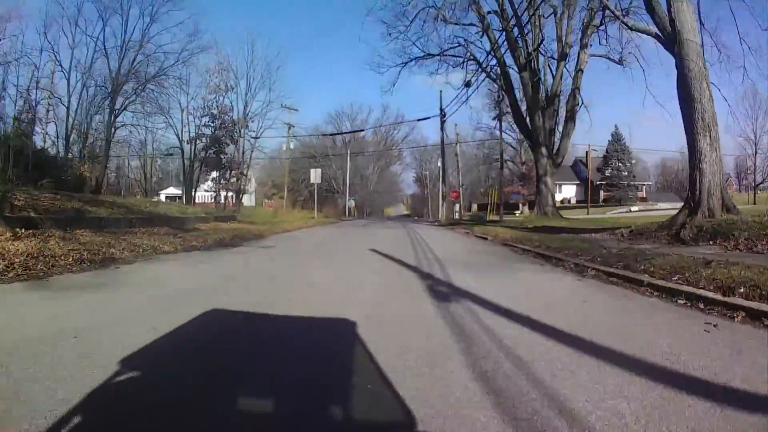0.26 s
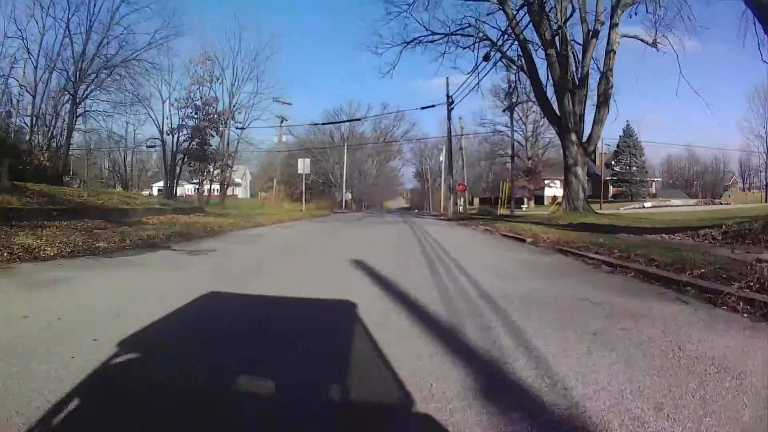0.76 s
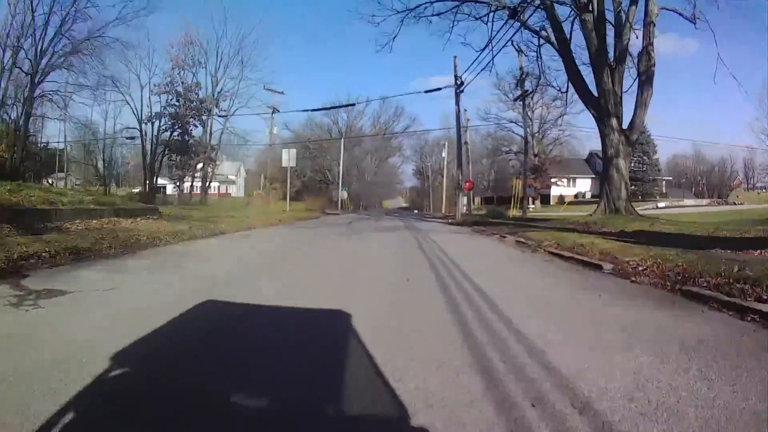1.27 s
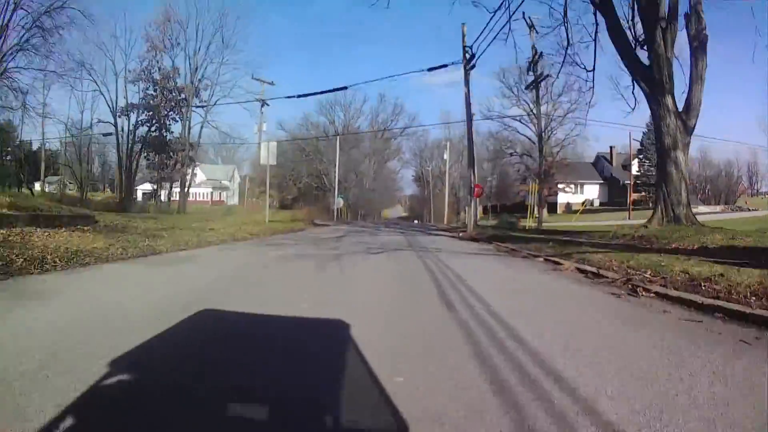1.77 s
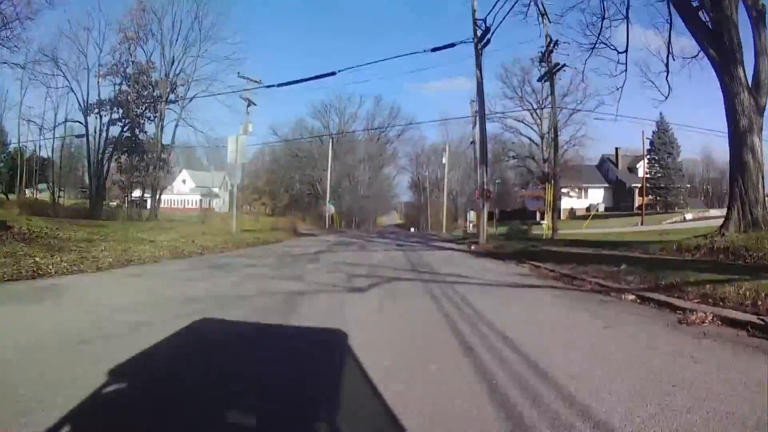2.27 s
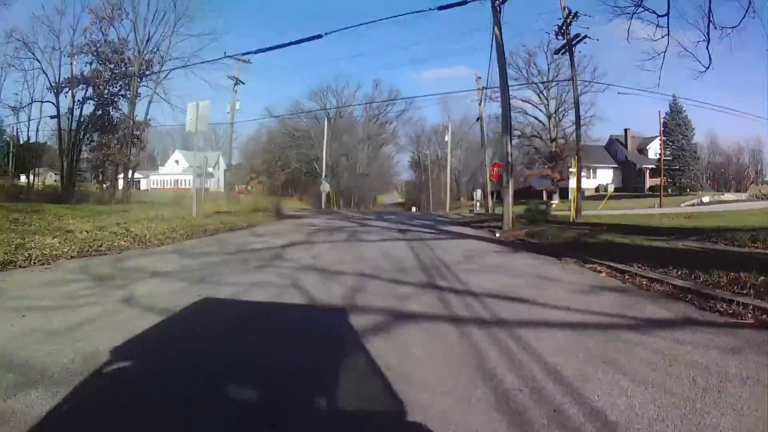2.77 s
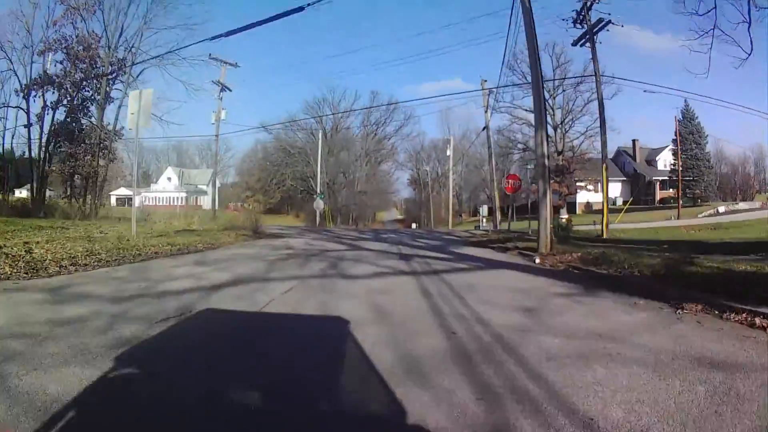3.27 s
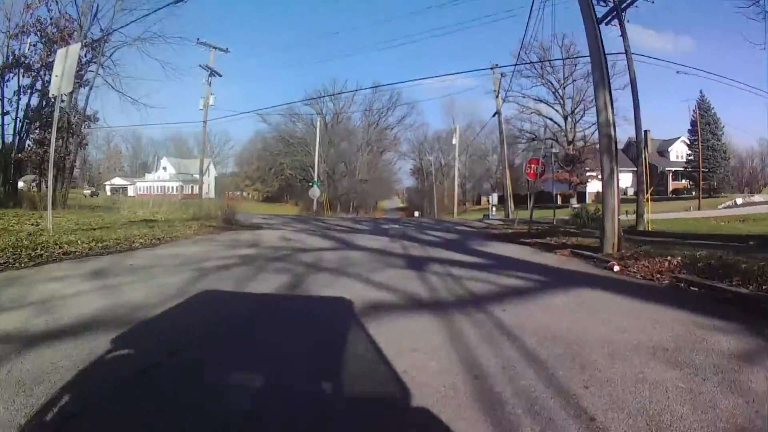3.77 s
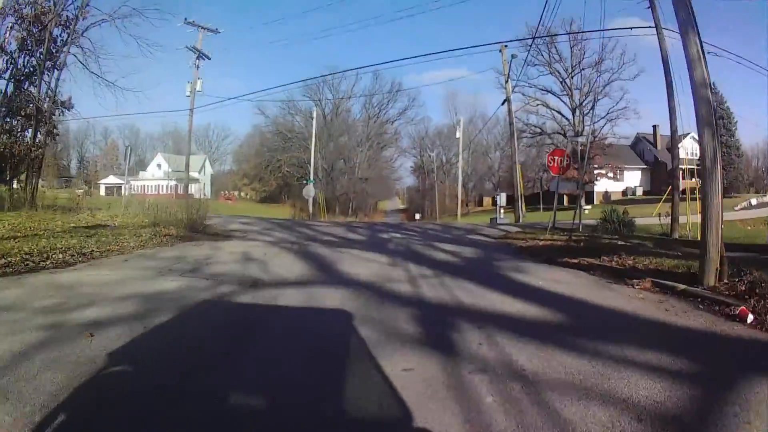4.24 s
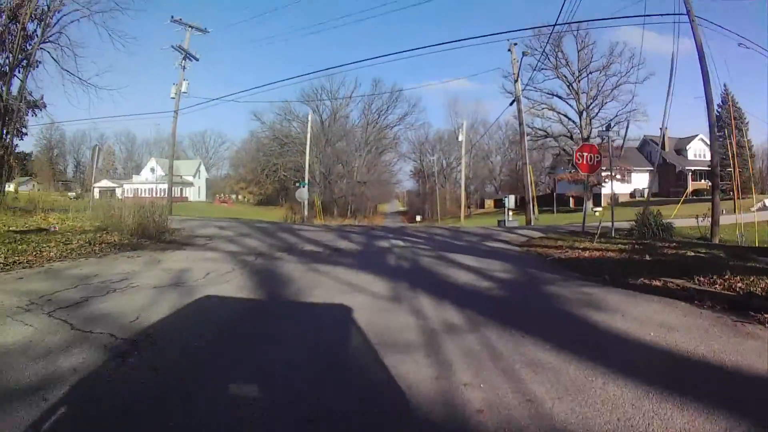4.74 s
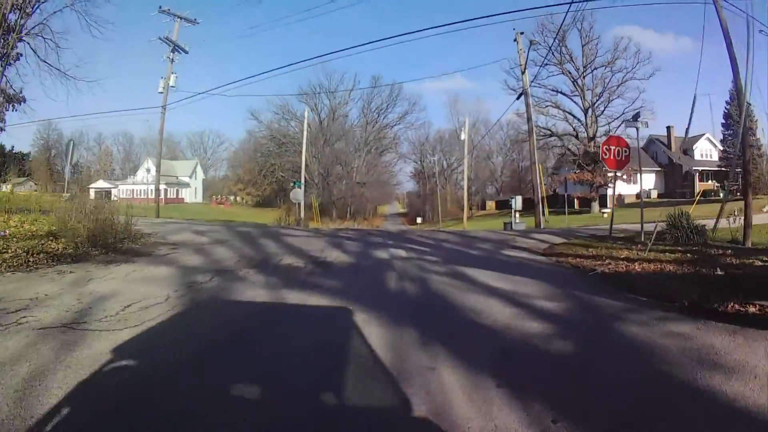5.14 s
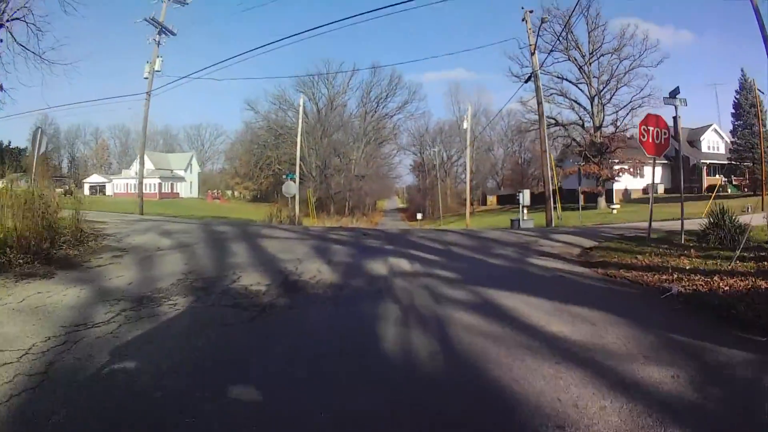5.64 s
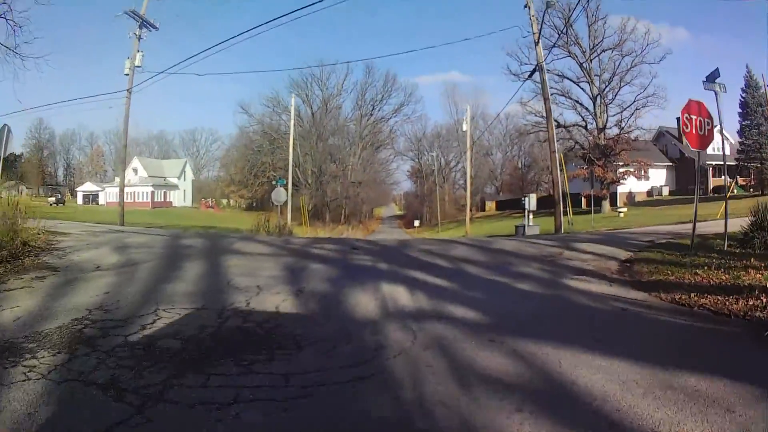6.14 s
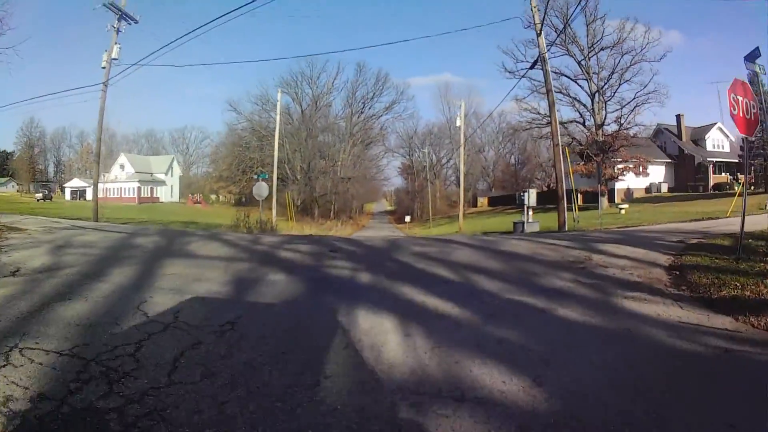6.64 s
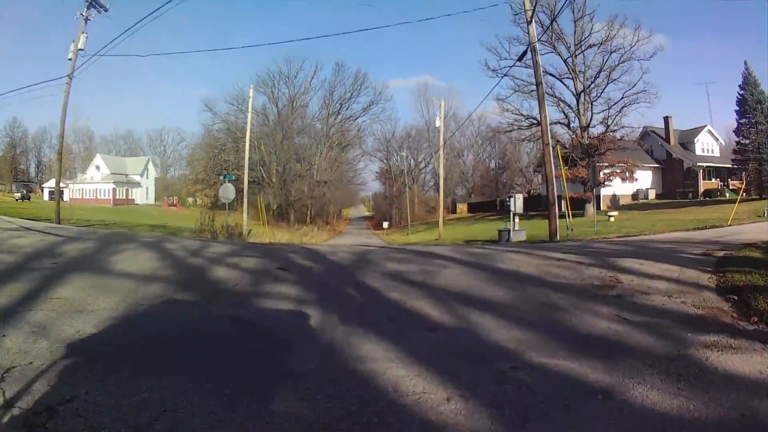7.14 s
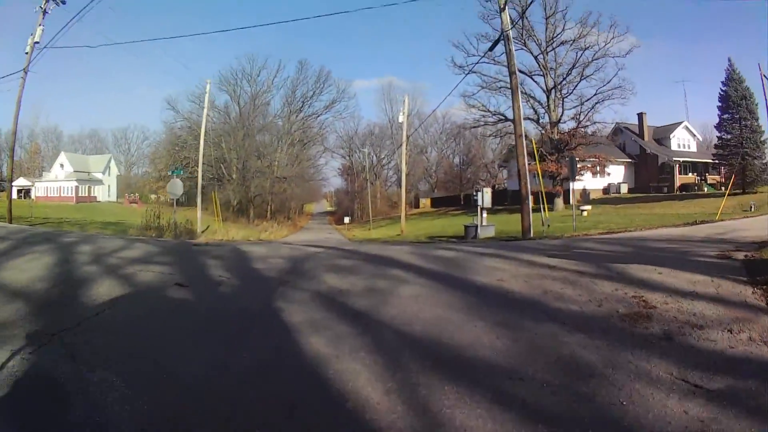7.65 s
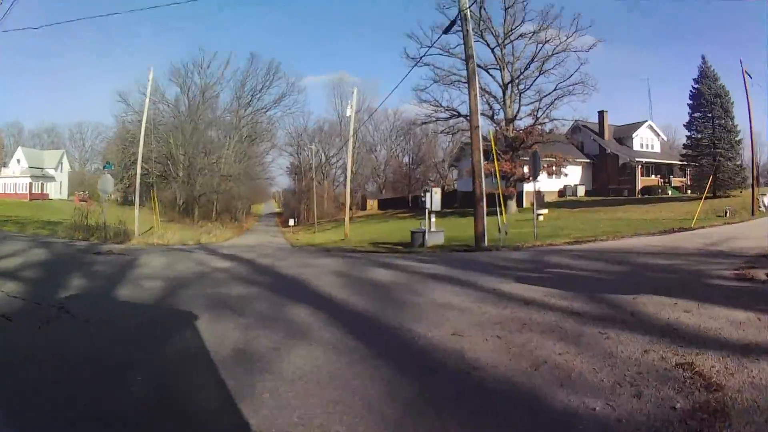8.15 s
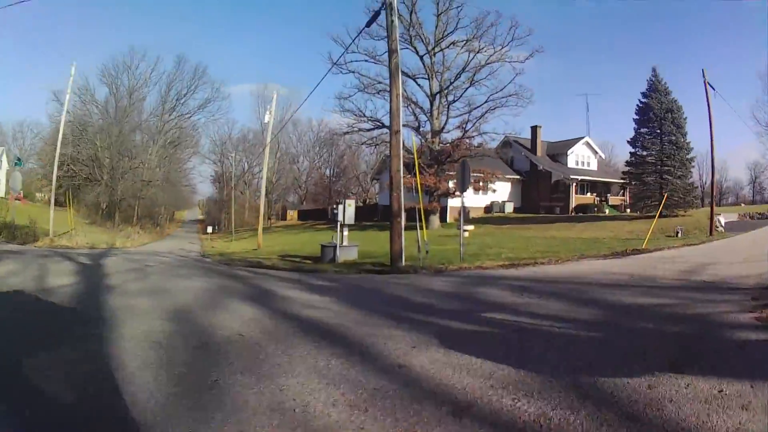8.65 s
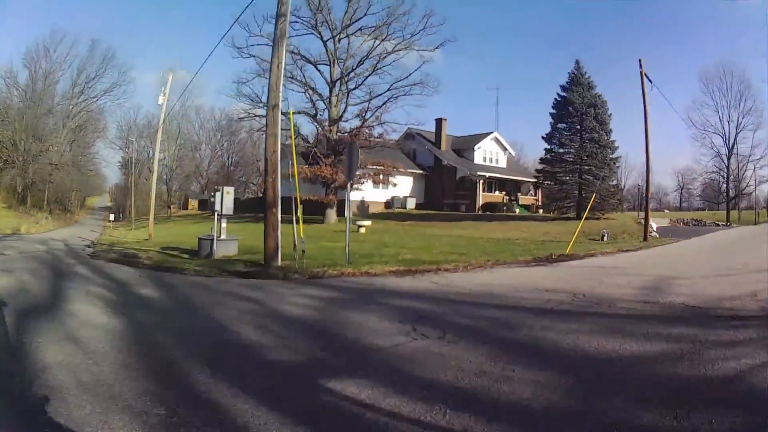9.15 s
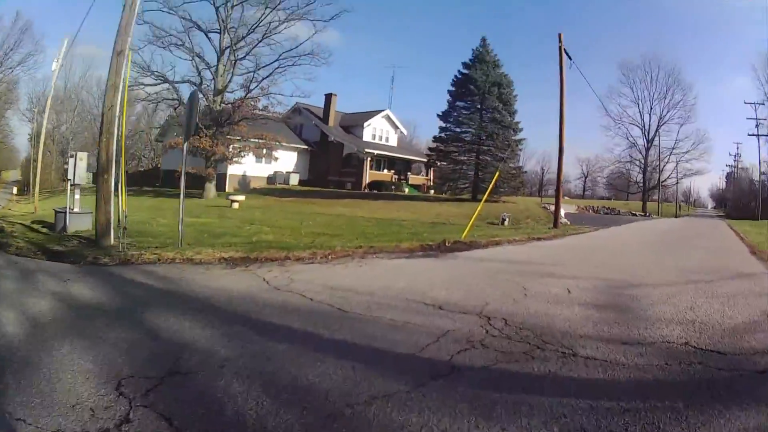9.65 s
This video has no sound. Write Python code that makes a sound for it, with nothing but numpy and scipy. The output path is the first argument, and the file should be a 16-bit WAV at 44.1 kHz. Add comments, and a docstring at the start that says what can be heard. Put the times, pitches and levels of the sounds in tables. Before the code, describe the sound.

Heard from on board a small petrol cart on an open road: coarse tyre roar, low chassis rumble, and a single-cylinder engine ticking over on the coast. Early jolts clunk the suspension and shake loose panels. The cart slows, roar fades, and belt chirps and valve knocks stand out over a gritty rhythmic rub. Near seven seconds the engine thumps unevenly, catches and pulls away with a throaty growl.

```python
"""Golf cart on board

A single-cylinder four-stroke cart rolls along a road, coasts down towards a junction and pulls away.
Gas puffs ring the exhaust, the belt squeaks once a cycle, the valves knock several times a cycle, the body
booms; tyres roar, and something, probably a brake drum, rubs rhythmically and shakes the loose fittings."""
import sys
import numpy as np
from scipy import signal
from scipy.fft import rfft, irfft
from scipy.io import wavfile
from scipy.ndimage import uniform_filter1d, minimum_filter1d

SR = 44100
rng = np.random.default_rng(int(sys.argv[2]) if len(sys.argv) > 2 else 0)


def wav_out(sig):
    """Save sig, one row per channel (or a flat mono array), as 16-bit PCM at SR to the path in sys.argv[1]."""
    wavfile.write(sys.argv[1], SR, np.round(np.clip(np.atleast_2d(sig).T, -1, 1) * 32767).astype(np.int16))


N = 437031
TIME_S = np.arange(N) / SR


def undb(db):
    """Decibels to gain."""
    return 10 ** (np.asarray(db) / 20)


def unit(x):
    """Scale to rms 1."""
    return x / np.sqrt(np.mean(x ** 2))


def curves(table):
    """Columns of a (start_s, ..) table, interpolated to one value per sample."""
    start_s, *columns = np.transpose(table)
    return [np.interp(TIME_S, start_s, column) for column in columns]


def noise():
    """White noise."""
    return rng.standard_normal(N)


def walk(rate_hz):
    """Random levels held 1 / rate_hz and slewed twice; rms 1."""
    hold = int(SR / rate_hz)
    steps = noise()[np.arange(N) // hold]
    return unit(uniform_filter1d(uniform_filter1d(steps, hold), hold))


def colour(x, points):
    """Causal minimum-phase filter through (freq_hz, level_db) points, by folding the cepstrum."""
    size = 8192
    freq_hz, level_db = np.transpose(points)
    bins_hz = np.arange(size // 2 + 1) * SR / size
    response_db = np.interp(np.log(bins_hz + 1), np.log(freq_hz), level_db)
    cepstrum = irfft(np.log(undb(response_db)))
    cepstrum[1:size // 2] *= 2
    cepstrum[size // 2 + 1:] = 0
    return signal.oaconvolve(x, irfft(np.exp(rfft(cepstrum))))[:N]


def lowpass(x, cutoff_hz):
    """Steep low-pass."""
    return signal.sosfilt(signal.butter(4, cutoff_hz, fs=SR, output="sos"), x)


def ring(x, modes):
    """Drive damped modes (freq_hz, width_hz, level_db); each swings against the one before."""
    t = TIME_S[:SR // 8]
    response = 0
    for k, (freq_hz, width_hz, level_db) in enumerate(modes):
        decay = width_hz * np.exp(-np.pi * width_hz * t)
        response = response + (-1) ** k * undb(level_db) * decay * np.cos(2 * np.pi * freq_hz * t)
    return signal.oaconvolve(x, response / SR)[:N]


def fade(x, decay_s):
    """Give every impulse an exponential tail."""
    return signal.lfilter([1], [1, -np.exp(-1 / (decay_s * SR))], x + 1e-18)


def impulses(times_s, sizes):
    """One impulse at each time."""
    return np.bincount(np.clip(np.asarray(times_s) * SR, 0, N - 1).astype(int), sizes, N)


def strike(blows, modes):
    """Blows (start_s, peak_db) that ring one set of modes."""
    start_s, peak_db = np.transpose(blows)
    single_peak = np.abs(ring(impulses([0], [1]), modes)).max()
    return ring(impulses(start_s, undb(peak_db)), modes) / single_peak


def strokes(table, cycle, throttle, scatter_db, jitter_s):
    """Impulses (place_cycles, coast_db, pull_db) in each engine cycle; throttle blends the two gains."""
    out = 0
    for place_cycles, coast_db, pull_db in table:
        times_s = np.interp(np.arange(int(cycle[-1]) + 1) + place_cycles, cycle, TIME_S)
        chance = rng.standard_normal((len(times_s), 2))
        load = np.interp(times_s, TIME_S, throttle)
        size = (1 - load) * undb(coast_db) + load * undb(pull_db)
        size = size * undb(scatter_db * chance[:, 1])
        inside = times_s < TIME_S[-1]
        out = out + impulses(times_s + jitter_s * chance[:, 0], size * inside)
    return out


# gas puffs of one cycle: place_cycles, coast_db, pull_db (relative)
PUFFS = [(.156, -20, 0), (.193, -18, -7), (.277, -11, -6), (.562, -20, -7.5), (.722, -13, -4.5)]
# exhaust response: freq_hz, level_db
PIPE_RESPONSE = [(30, -32), (55, -15), (85, 3), (120, 3), (160, 2.5), (195, -5.5), (240, 2), (330, -7.5),
                 (435, -17), (650, -10.5), (2000, -50)]
# muffler growl response: freq_hz, level_db
GROWL_RESPONSE = [(150, -37), (245, -8), (272, 3), (300, 3.5), (325, -1.5), (352, -.5), (388, 0), (410, -5),
                  (450, -25), (1000, -54)]
# gas hiss spectrum: freq_hz, level_db (per Hz)
GAS_SPECTRUM = [(250, 1), (450, 21.5), (700, 17), (1500, 8.5), (2700, -3), (3300, 4), (7000, -15.5),
                (12000, -31)]
# multiple that sings out under load: start_s, peak_db (before its waver)
DRONE_LEVEL = [(7.1, -60), (7.42, -33), (7.85, -28.5), (8.2, -27.5), (8.8, -28.5), (9.3, -33), (9.91, -32)]
PIPE_DB, GROWL_DB, GAS_DB = -33, -36.5, -39.0
DRONE_MULTIPLE, DRONE_WAVER_DB = 21, 3.1


def exhaust(cycle, throttle, speed_hz):
    """Puffs ring the pipe, harder at speed, each with gas hiss; load adds growl, one multiple sings."""
    puffs = strokes(PUFFS, cycle, throttle, scatter_db=.6, jitter_s=.00004)
    puffs = puffs * (speed_hz / speed_hz.mean()) ** 2.2
    pipe = undb(PIPE_DB) * unit(colour(puffs, PIPE_RESPONSE))
    growl = undb(GROWL_DB) * unit(colour(puffs * throttle ** 2, GROWL_RESPONSE))
    gas = undb(GAS_DB) * unit(colour(fade(puffs, decay_s=.012) * noise(), GAS_SPECTRUM))
    drone = np.cos(2 * np.pi * (DRONE_MULTIPLE * cycle + .011 * walk(12)))
    drone = drone * undb(curves(DRONE_LEVEL)[0] + DRONE_WAVER_DB * walk(9))
    return pipe + growl + drone + gas


# lone firings: start_s, peak_db (of the muffler ring)
FIRST_FIRINGS = [(6.73, -26), (6.764, -29), (6.986, -22), (7.017, -23), (7.222, -22), (7.254, -23),
                 (7.321, -21), (7.393, -23), (7.447, -18), (7.51, -22), (7.574, -22), (7.766, -22)]
# muffler modes: freq_hz, width_hz, level_db
MUFFLER_MODES = [(100, 20, 2), (165, 35, -3), (285, 40, 0), (480, 70, -10)]
GUST_DB = -7.5  # relative to the firing


def catching():
    """Lone firings as the engine catches: each thumps the muffler and blows a gust of gas."""
    start_s, peak_db = np.transpose(FIRST_FIRINGS)
    gust = unit(colour(noise(), CHASSIS_SPECTRUM)) * fade(impulses(start_s, undb(peak_db)), decay_s=.025)
    return strike(FIRST_FIRINGS, MUFFLER_MODES) + undb(GUST_DB) * gust


# body boom: start_s, level_db (before waver and load cut)
BOOM_LEVEL = [(0, -38.5), (.9, -40), (1.5, -43), (1.75, -35), (3, -39), (4.5, -39), (5.7, -42.5),
              (6.3, -52), (6.8, -52), (7.4, -38.5), (8.3, -44), (9.91, -47)]
BOOM_WAVER_DB, BOOM_LOAD_CUT_DB = 1.0, 6.3


def boom(cycle, throttle):
    """The body shakes at five times the cycle, less under load, and throbs once and twice a cycle."""
    tone = np.cos(2 * np.pi * (5 * cycle + .48 + .027 * walk(12)))
    throb = 1 + .2 * np.cos(2 * np.pi * (cycle - .4)) + .43 * np.cos(4 * np.pi * (cycle - .44))
    level_db = curves(BOOM_LEVEL)[0] + BOOM_WAVER_DB * walk(14.0) - BOOM_LOAD_CUT_DB * throttle
    return unit(tone * throb) * undb(level_db)


# valve knocks of one cycle: place_cycles, coast_db, pull_db (relative)
KNOCKS = [(.035, -2, -3), (.13, -4, -8), (.4, -6, -1), (.55, -6, 2), (.85, -9, -4)]
# engine cover modes: freq_hz, width_hz, level_db
COVER_MODES = [(1732, 36, 27.5), (1966, 52, 27.5), (1090, 42, -12)]
# broad cover response to a blow: freq_hz, width_hz, level_db
COVER_PANEL = [(1850, 170, 0)]
# valve knock level: start_s, level_db
KNOCK_LEVEL = [(0, -37.5), (1.5, -43.5), (2.5, -37), (3.6, -37.5), (5.2, -34.5), (5.8, -34.5), (6.5, -35),
               (7.8, -38), (9.91, -41)]


def valves(cycle, throttle):
    """Several valve knocks a cycle ring the engine cover, each with brief chatter."""
    knocks = strokes(KNOCKS, cycle, throttle, scatter_db=.5, jitter_s=.0003)
    chatter = noise() * (.018 * fade(knocks, decay_s=.006) + .015 * fade(knocks, decay_s=.045))
    cover = ring(ring(knocks + chatter, COVER_MODES), COVER_PANEL)
    return unit(lowpass(cover, cutoff_hz=2150)) * undb(curves(KNOCK_LEVEL)[0])


# belt squeak: start_s, peak_db (before scatter)
SQUEAK_LEVEL = [(0, -36), (2.5, -27), (4, -23), (5.15, -17.5), (5.8, -24.5), (6.3, -22), (7.4, -21.5),
                (8, -26), (8.8, -22), (9.91, -23.5)]
SQUEAK_PLACE_CYCLES, SQUEAK_HALF_S = .997, .0056
SQUEAK_LOW_HZ, SQUEAK_HIGH_HZ, SQUEAK_HIGH_SHARE = 1765, 1935, .55
SQUEAK_SCATTER_HZ, SQUEAK_SCATTER_DB = 25, 1.2


def belt(cycle):
    """One chirp per cycle, probably the drive belt; its two tones beat, so it peaks in a sharp tick."""
    times_s = np.interp(np.arange(int(cycle[-1])) + SQUEAK_PLACE_CYCLES, cycle, TIME_S)
    t = np.arange(-SR // 80, SR // 80) / SR
    envelope = np.exp(-np.abs(t / SQUEAK_HALF_S) ** 1.5)
    level_db = curves(SQUEAK_LEVEL)[0]
    out = np.zeros(N + len(t))
    for start_s, chance in zip(times_s, rng.standard_normal((len(times_s), 3))):
        i = int(start_s * SR)
        low = np.cos(2 * np.pi * t * (SQUEAK_LOW_HZ + SQUEAK_SCATTER_HZ * chance[0]))
        high = np.cos(2 * np.pi * t * (SQUEAK_HIGH_HZ + SQUEAK_SCATTER_HZ * chance[1]))
        tone = (1 - SQUEAK_HIGH_SHARE) * low + SQUEAK_HIGH_SHARE * high
        out[i:i + len(t)] += tone * envelope * undb(level_db[i] + SQUEAK_SCATTER_DB * chance[2])
    return out[len(t) // 2:][:N]  # centre each chirp on its time


# engine mount tones: cycle_multiple, peak_db (coasting at mean speed, before waver)
HUM_TONES = [(8, -49), (10, -43), (12, -46), (13, -47), (16, -49), (18, -44.5), (20, -46), (22, -48),
             (23, -45)]
HUM_WAVER_DB = 1.5


def hum(cycle, throttle, speed_hz):
    """The coasting engine hums through its mounts on multiples of the cycle, and fades as it slows."""
    uneven = cycle + .002 * walk(8)
    tones = 0
    for multiple, peak_db in HUM_TONES:
        tones = tones + undb(peak_db) * np.cos(2 * np.pi * (multiple * uneven + rng.random()))
    return tones * undb(HUM_WAVER_DB * walk(8)) * (1 - throttle) * (speed_hz / speed_hz.mean()) ** 3


# tyres and chassis: start_s, roar_db (before waver), rumble_db (before waver)
ROAD_LEVEL = [(0, -26, -26), (.9, -27, -28), (1.1, -26, -25), (1.3, -27, -27.5), (1.62, -27, -23.5),
              (1.8, -27.5, -29), (3, -28.5, -30), (4, -31, -32.5), (5.6, -35.5, -35), (5.85, -34, -37.5),
              (6.6, -35.5, -39), (7, -31.5, -38), (7.5, -33, -33), (8.1, -32, -36.5), (9.91, -31.5, -36)]
# tyre roar spectrum: freq_hz, level_db (per Hz)
TYRE_SPECTRUM = [(400, -5), (700, -0.5), (900, -1), (1020, 0.5), (1170, 1.5), (1400, -2.5), (1700, 0.5),
                 (2000, -6.5), (2200, -10.5), (2700, -30.5), (4500, -36.5)]
# chassis rumble spectrum: freq_hz, level_db (per Hz)
CHASSIS_SPECTRUM = [(25, -13), (50, -12.5), (90, 3), (135, -5.5), (190, 1.5), (250, -3.5), (330, 1.5),
                    (400, -3), (470, 1), (620, -3.5), (850, -10), (2000, -64.5)]
# floor panel modes: freq_hz, width_hz, level_db
FLOOR_MODES = [(440, 28, 0), (512, 32, 0), (640, 35, -5)]
FLOOR_DB = -42


def road():
    """Tyres roar on coarse asphalt as filtered noise; the chassis rumbles and the floor panel rings."""
    roar_db, rumble_db = curves(ROAD_LEVEL)
    roar = unit(colour(noise(), TYRE_SPECTRUM)) * undb(roar_db + 1.24 * walk(35))
    rumble = unit(colour(noise(), CHASSIS_SPECTRUM)) * undb(rumble_db + .3 * walk(22))
    floor = undb(FLOOR_DB) * unit(ring(noise(), FLOOR_MODES))
    return roar + rumble + floor


# body resonance that the tread excites: freq_hz, width_hz, level_db
TREAD_MODES = [(106, 11, 0)]
# tread hum: start_s, level_db
TREAD_LEVEL = [(0, -34), (1.6, -38), (2.6, -39), (3.3, -44.5), (7, -76), (9.91, -49)]
TREAD_MULTIPLE = 20  # tread cycles per pair of rubs


def tread(rub_pairs):
    """The tyre tread hums: a tone at a multiple of the rub rhythm drives a body resonance."""
    tone = np.cos(2 * np.pi * (TREAD_MULTIPLE * rub_pairs + .28 * walk(6.5)))
    return unit(ring(tone, TREAD_MODES)) * undb(curves(TREAD_LEVEL)[0])


# road jolts: start_s, peak_db (of the suspension clunk)
BUMPS = [(1.03, -15.5), (1.099, -12), (1.2, -17), (1.4, -14), (1.56, -13), (1.608, -12), (2.26, -19),
         (3.226, -11), (3.468, -16), (4.284, -18)]
# body thud spectrum: freq_hz, level_db (per Hz)
THUD_SPECTRUM = [(50, -22), (130, 0), (200, 1), (330, 2), (450, -3), (620, -3), (900, -12), (2000, -45)]
# suspension modes: freq_hz, width_hz, level_db
SUSPENSION_MODES = [(195, 28, -5), (335, 30, -3), (470, 35, -5), (555, 22, 2), (645, 28, -1)]
THUD_DB, THUD_DECAY_S = -11.5, .04  # level relative to the jolt


def bumps():
    """Each road jolt clunks the suspension modes and thuds the body as a burst of low noise."""
    start_s, peak_db = np.transpose(BUMPS)
    thuds = unit(colour(noise(), THUD_SPECTRUM)) * fade(impulses(start_s, undb(peak_db)), THUD_DECAY_S)
    return undb(THUD_DB) * thuds + strike(BUMPS, SUSPENSION_MODES)


# rattle spectrum: freq_hz, level_db (per Hz)
RATTLE_SPECTRUM = [(800, -10), (1600, 6), (2300, 4.5), (2800, -5), (3250, 0), (3800, -5.5), (4500, -6.5),
                   (6500, -12), (10000, -14.5), (13000, -47)]
# chatter of the fittings: start_s, level_db
RATTLE_LEVEL = [(0, -38), (1.35, -41), (1.6, -30), (1.8, -41), (2.15, -29.5), (2.7, -40), (4.1, -44),
                (4.6, -62), (6.9, -64), (8, -37.5), (8.4, -41), (9.91, -40)]
# hardest clacks: start_s, peak_db (before crackle), decay_s
CLACKS = [(1.025, -25, .025), (1.104, -25, .01), (1.143, -21, 0.015), (1.188, -27, 0.006),
          (1.439, -27, 0.0074), (1.524, -26.5, 0.023), (1.61, -21.5, 0.06), (1.835, -25, 0.011),
          (1.906, -27, 0.0074), (2.148, -35, 0.02), (2.225, -30, .016), (2.672, -29, 0.0069),
          (3.21, -32, 0.036), (6.003, -32, 0.023), (6.639, -36, .023), (7.449, -24, 0.016),
          (7.517, -22, .0095)]
SHAKE_DB, SHAKE_LEAD_PAIRS = 3, .07  # ticks swell just ahead of each rub
TICK_DECAY_S, CRACKLE_DB = .002, 4.5


def fittings(rub_pairs, swing):
    """Loose panels chatter in small random ticks, most just ahead of each rub, with harder clacks."""
    draws = rng.random((4000, 2))
    sizes = undb(-3.6 * np.log(draws[:, 1])).clip(0, 6)
    ticks = impulses(draws[:, 0] * TIME_S[-1], sizes)
    shake = undb(SHAKE_DB * swing * np.cos(4 * np.pi * (rub_pairs + SHAKE_LEAD_PAIRS)))
    chatter = unit(colour(fade(ticks * shake, TICK_DECAY_S) * noise(), RATTLE_SPECTRUM))
    chatter = chatter * undb(curves(RATTLE_LEVEL)[0])
    clacks = sum(fade(impulses([start_s], [undb(peak_db)]), decay_s) for start_s, peak_db, decay_s in CLACKS)
    grain = noise() * undb(CRACKLE_DB * walk(450))
    return chatter + clacks * unit(colour(grain, RATTLE_SPECTRUM))


# clinks: start_s, peak_db
CLINKS = [(.331, -33), (.63, -29), (1.961, -25), (2.044, -27), (2.205, -25), (2.229, -28), (2.289, -27),
          (2.396, -26), (2.762, -33), (2.832, -32), (3.398, -31), (3.578, -33), (3.768, -33), (4.044, -36),
          (4.221, -32), (4.83, -30), (5.45, -35), (5.745, -37), (5.83, -36), (6.09, -34), (6.825, -35),
          (7.0, -35), (7.09, -35), (7.32, -35), (7.37, -35)]
# clink spectrum: freq_hz, level_db (per Hz)
CLINK_SPECTRUM = [(1200, -25), (2400, -8), (2850, -7), (3280, 0), (3700, -9), (4500, -14), (7000, -19),
                  (13000, -30)]
CLINK_DECAY_S = .005


def clinks():
    """One loose metal part clinks in short bursts of bright noise."""
    start_s, peak_db = np.transpose(CLINKS)
    bursts = fade(impulses(start_s, undb(peak_db)), CLINK_DECAY_S)
    return unit(colour(noise(), CLINK_SPECTRUM)) * bursts


# rub spectrum: freq_hz, level_db (per Hz)
RUB_SPECTRUM = [(2000, 7), (2900, -9), (3250, 8.5), (3900, 1), (5700, 1.5), (7100, 7), (8000, 1), (9500, 4),
                (10500, -2), (12300, 11.5), (13000, -11)]
# rubbing drum: start_s, level_db
RUB_LEVEL = [(0, -42), (1.3, -43.5), (1.6, -41.5), (2.5, -45.5), (5.2, -43), (5.7, -40), (6.1, -43.5),
             (7.1, -43.5), (8, -42), (9.91, -41.5)]
# level change midway between rubs: start_s, change_db
RELEASE = [(0, -5), (4.4, -8), (5.4, -3), (5.5, -4), (5.83, 3.5), (5.92, -7), (6.95, -6), (7.5, -2.5),
           (9.91, -3.5)]
UNEVEN_DB, GRIT_DB = 1.9, 3.26


def brake(rub_pairs):
    """A gritty hiss, probably a brake drum, whose level changes between rubs, mostly dipping."""
    release = np.sin(2 * np.pi * rub_pairs) ** 6
    pressure_db = curves(RELEASE)[0] * release + UNEVEN_DB * walk(55) + GRIT_DB * walk(600)
    return unit(colour(undb(pressure_db) * noise(), RUB_SPECTRUM)) * undb(curves(RUB_LEVEL)[0])


# engine speed: start_s, cycles_hz
ENGINE_SPEED = [(0.0, 17.909), (0.85, 17.197), (1.71, 19.557), (2.0, 19.232), (2.43, 17.666),
                (2.79, 16.949), (4.93, 15.147), (5.48, 14.15), (6.49, 10.221), (7.0, 11.889), (7.73, 15.88),
                (8.18, 17.535), (8.93, 17.017), (9.35, 16.319), (9.91, 17.109)]
# rub rhythm, half the rubs per second: start_s, rub_pairs_hz
RUB_RHYTHM = [(0, 6.37), (.7, 6.412), (1.3, 6.172), (1.8, 6.546), (2.6, 5.473), (3.3, 5.388), (3.9, 5.498),
              (4.5, 5.69), (4.9, 2.934), (5.4, 3.266), (5.9, 2.403), (6.5, 2.202), (7, 3.622), (7.5, 3.501),
              (8, 4.191), (8.6, 5.338), (9.2, 4.95), (9.91, 4.852)]
# throttle: start_s, opening_0_1
THROTTLE = [(0, .1), (.7, .1), (1.55, .2), (1.8, .08), (6.6, .02), (7.15, .12), (7.45, .72), (7.7, .72),
            (7.9, 1), (9.91, 1)]
START_CYCLES, START_RUB_PAIRS = -.502, -.183
PULL_STEADYING = .3  # share of the fittings' swing removed at full throttle


def scene():
    """Integrate engine speed and rub rhythm to phase, then sum all sources at fixed distance, in mono."""
    speed_hz, rub_pairs_hz, throttle = curves(ENGINE_SPEED) + curves(RUB_RHYTHM) + curves(THROTTLE)
    cycle = START_CYCLES + np.cumsum(speed_hz) / SR
    rub_pairs = START_RUB_PAIRS + np.cumsum(rub_pairs_hz) / SR
    swing = 1 - PULL_STEADYING * throttle
    engine = exhaust(cycle, throttle, speed_hz) + catching() + boom(cycle, throttle)
    engine = engine + valves(cycle, throttle) + belt(cycle) + hum(cycle, throttle, speed_hz)
    running_gear = road() + tread(rub_pairs) + bumps() + fittings(rub_pairs, swing)
    running_gear = running_gear + clinks() + brake(rub_pairs)
    return (engine + running_gear)[None]


# overall tone, two narrow gaps in the treble near 5 and 10.7 kHz: freq_hz, level_db
OVERALL_TONE = [(20, 0), (4500, 0.5), (4900, -32), (5250, -31), (5600, 0.5), (10000, -6.5), (10700, -45),
                (11400, -7.5), (20000, -27)]
BASS_CUT_HZ, TOP_HZ = 42, 12750
CEILING = .17  # limiter threshold, full scale = 1


def record(dry):
    """Thin the deep bass, limit peaks, set the overall tone with two treble gaps and cut the top."""
    x = signal.sosfilt(signal.butter(2, BASS_CUT_HZ, "high", fs=SR, output="sos"), dry[0])
    gain = minimum_filter1d(CEILING / np.maximum(np.abs(x), CEILING), size=300)
    limited = x * uniform_filter1d(gain, size=300)
    x = colour(limited, OVERALL_TONE)
    return signal.sosfilt(signal.ellip(10, .2, 80, TOP_HZ, fs=SR, output="sos"), x)[None]


dry = scene()
out = record(dry)
wav_out(out)
```